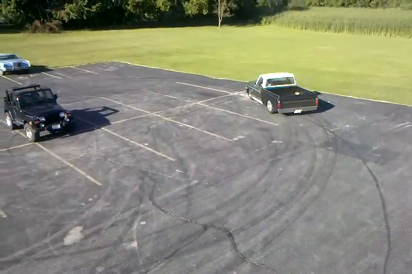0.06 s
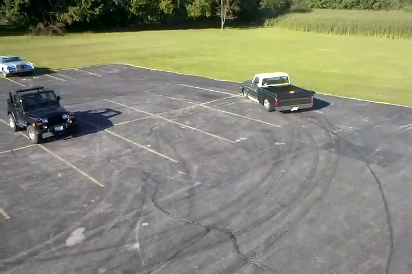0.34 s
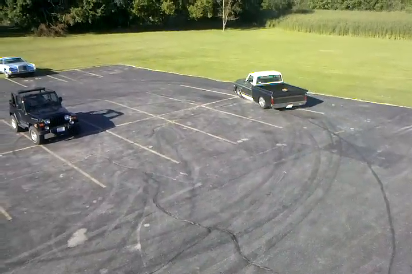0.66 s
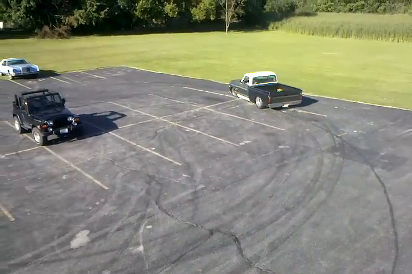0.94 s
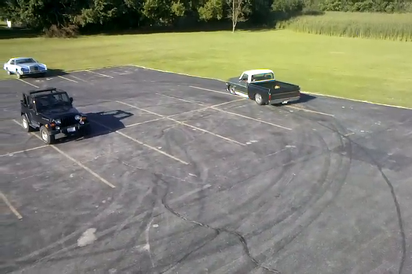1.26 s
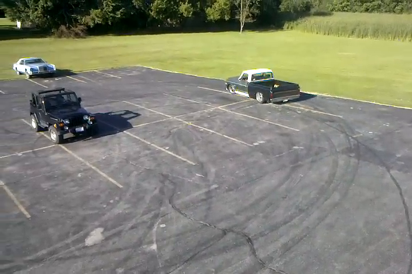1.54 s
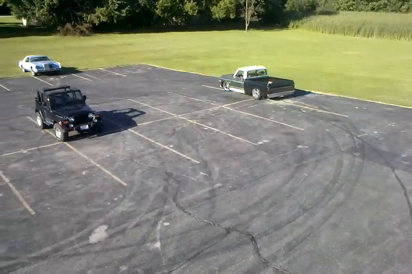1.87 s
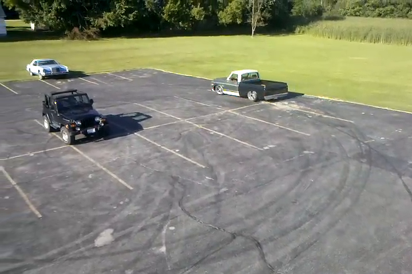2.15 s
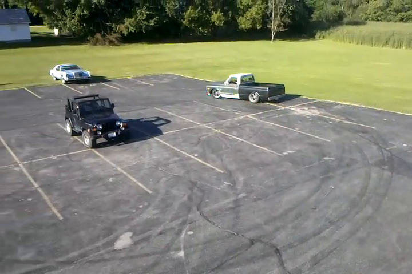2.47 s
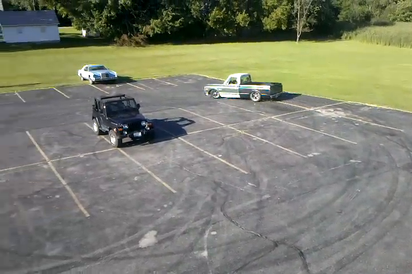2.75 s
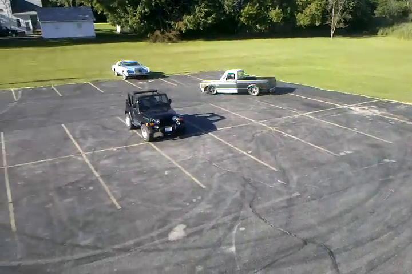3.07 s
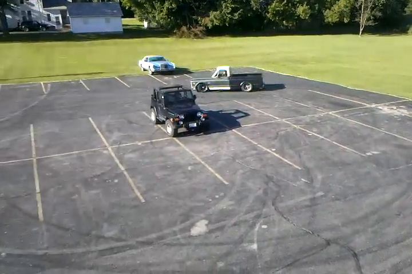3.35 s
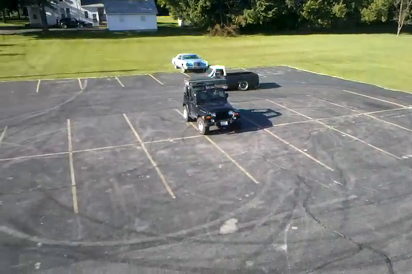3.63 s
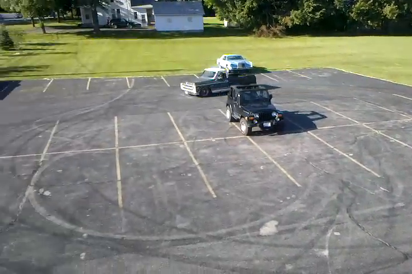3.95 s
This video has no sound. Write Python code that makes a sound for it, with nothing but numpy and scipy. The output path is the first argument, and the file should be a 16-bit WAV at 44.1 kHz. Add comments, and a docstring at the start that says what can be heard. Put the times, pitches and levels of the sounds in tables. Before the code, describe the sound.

A pickup truck's tyres squeal in an open lot. At first its engine burbles low over a faint outdoor rush. From about 1.3 seconds it revs up, with a few faint tyre squeaks. At 2 seconds a loud, rough, wavering squeal begins over the booming exhaust, easing slightly around 3 seconds. From 3.3 seconds the engine climbs higher and the squeal broadens into a scrubbing howl until 4 seconds.

```python
"""A V8 pickup burbles across an open asphalt lot, then is floored into a slide and swings nearer.
Its exhaust booms at the firing rate, shaped by the resonances of the pipe. Two tyres stick and slip
in rough, wavering squeals that break up into a broad scrubbing howl. Trees and parked cars echo the
squeals faintly, over a steady outdoor rush."""
import sys
import numpy as np
from scipy import signal
from scipy.fft import rfft, irfft
from scipy.io import wavfile

SR = 44100
rng = np.random.default_rng(int(sys.argv[2]) if len(sys.argv) > 2 else 0)


def bounce(signal):
    """Save signal as a 16-bit WAV file at the path given by the first command-line argument."""
    frames = np.transpose(np.atleast_2d(signal))
    limited = np.clip(frames, -1, 1)
    pcm = np.round(limited * 32767).astype(np.int16)
    wavfile.write(sys.argv[1], SR, pcm)


N = 176400
TIME = np.arange(N) / SR

# engine run (time [s], firing rate [Hz], level ahead of the pipe [dB])
ENGINE_RUN = [(0, 81.07, -46.5), (.63, 80.2, -40.5), (.74, 70.7, -31), (1.0, 69.35, -34),
              (1.14, 82.05, -33), (1.3, 88.75, -40), (1.6, 103.8, -35.5), (1.75, 119.7, -31),
              (1.89, 137.8, -21.5), (2.02, 144.2, -19.5), (2.23, 137.1, -22), (2.42, 120.4, -22.5),
              (2.76, 132.6, -23.5), (3.16, 165.4, -19), (3.32, 181.6, -20.5), (3.5, 204.2, -23.5),
              (3.86, 250.6, -23.5), (4, 255.8, -32)]
# strong exhaust harmonics; 8 is the firing rate (order [multiple of cycle rate], relative level [dB])
STRONG_ORDERS = [(5, -12), (6, -18.5), (8, 1.5), (10, -17.5), (11, -15), (12, -18), (13, -15), (16, -11)]
# exhaust pipe response (frequency [Hz], gain [dB])
PIPE_RESPONSE = [(35, -41), (65, -21.5), (88, -12.5), (110, -12), (141, -0.5), (180, 1), (250, -8.5),
                 (308, -5.5), (355, -10), (460, -18.5), (640, -12), (1500, -46.5)]
# uneven firing lifts the burble and the orders between firing harmonics (time [s], gain [dB])
UNEVEN_FIRING = [(0, 11), (.9, -8.5), (1.3, 10.5), (1.9, -2.5), (3.1, 2.5), (3.85, 9.5)]
# spectrum of the outdoor rush (frequency [Hz], gain [dB])
AIR_SPECTRUM = [(200, 5), (450, -2), (1000, 0.5), (2350, -6.5), (2750, -20), (5500, -21.5), (7500, -34)]
# strength of the rush (time [s], level [dB])
AIR_ENVELOPE = [(1, -44.5), (1.6, -47)]
# sliding rubber (time [s], carcass roar [dB], tread howl [dB], grit hiss [dB])
SCRUB_LEVELS = [(1.5, -71, -73, -64.5), (2.1, -39, -47.5, -48.5), (2.85, -37, -46.5, -46.5),
                (3.3, -21.5, -36, -42.5), (3.62, -23, -24, -41.5), (3.83, -26, -16.5, -35),
                (4, -26, -16.5, -43)]
# spectra of the roar, howl and hiss (frequency [Hz], gain [dB])
CARCASS_SPECTRUM = [(250, -10), (450, -5.5), (540, 1.5), (690, 2.5), (1050, 6), (1500, -38.5)]
TREAD_SPECTRUM = [(1000, -4.5), (1250, 2), (1450, 13.5), (1700, 9), (2000, -6), (2350, -4), (3250, -55)]
GRIT_SPECTRUM = [(1500, -19.5), (2300, 20.5), (2600, 8), (2900, 13), (3450, 3), (4100, 7.5), (6900, -0.5),
                 (7600, -46)]
# squeaks of creeping tread (time [s], duration [s], pitch [Hz], level [dB])
CREEP_CHIRPS = [(1.357, 0.19, 2160, -56), (1.47, 0.08, 720, -45), (1.627, 0.12, 4720, -61),
                (1.635, 0.085, 776, -52), (1.718, .12, 2116, -55.5)]
# the two squealing tyres (time [s], pitch [Hz], level [dB])
INNER_SQUEAL = [(1.995, 1146, -30), (2.035, 1002, -29), (2.08, 1125, -26.5), (2.14, 1040, -29.5),
                (2.185, 1096, -30), (2.195, 949, -20), (2.26, 982, -23), (2.272, 907.3, -15),
                (2.33, 916.4, -14.5), (2.42, 970.2, -18.5), (2.53, 988.1, -21.5), (2.69, 990, -28.5),
                (2.77, 1095, -26.5), (2.81, 1045, -31.5), (2.94, 1085, -28), (3.16, 1053, -26.5),
                (3.26, 1045, -37.5), (3.56, 930, -22.5), (3.78, 945, -21), (3.85, 885, -21),
                (3.93, 935, -17), (4, 875, -16)]
OUTER_SQUEAL = [(2.25, 859, -20.5), (2.5, 928, -37.5), (2.56, 904.6, -25), (2.61, 940.5, -41),
                (2.63, 932, -21.5), (2.66, 922.2, -32), (3.05, 1012, -37.5), (3.44, 845.2, -30),
                (3.57, 830.5, -18), (3.68, 823, -27), (3.82, 793, -21.5), (4, 770.6, -31.5)]
# squeal overtones (harmonic [multiple of pitch], relative level [dB])
SQUEAL_OVERTONES = [(2, 11.5), (3, -4), (5, -14)]
# the squeal coarsens as the slide widens (time [s], overtones re fundamental [dB], roughness [factor])
SLIP_TEXTURE = [(2, -13, 0.48), (2.25, -17.5, 0.703), (2.45, -13.5, .85), (2.85, -10.5, 1.094),
                (3.15, -9.5, .75), (3.35, -3, 1.45), (3.6, -10, 1.03), (4, -13.5, 1.4)]
# how the tyre radiates its overtones (frequency [Hz], gain [dB])
TYRE_RADIATION = [(1600, -12), (2050, 8.5), (2520, -3), (2850, 9.5), (3250, -11.5), (5000, 5)]
# moments when the sliding rubber bites (time [s])
BITE_TIMES = [2.259, 2.299, 2.357, 2.596, 2.795, 3.0, 3.2]

JITTER_SHARE, JITTER_HZ = 0.02075, 190  # stick-slip pitch spread at roughness 1, and its bandwidth


def undb(db):
    """Decibels to amplitude ratio."""
    return 10 ** (np.asarray(db) / 20)


def unit(x):
    """Normalisation to rms 1."""
    return x / np.sqrt(np.mean(x ** 2))


def curves(table):
    """Linear interpolation of each column over time."""
    rows = np.array(table, float)
    return [np.interp(TIME, rows[:, 0], col) for col in rows[:, 1:].T]


def response(points, hz):
    """Frequency response: gain interpolated in decibels over log frequency."""
    f, db = np.array(points, float).T
    return undb(np.interp(np.log(hz + 1e-9), np.log(f), db))


def colour(x, points):
    """Spectral shaping, with a roll-off below the lowest point; rms 1."""
    hz = np.arange(N // 2 + 1) * SR / N
    roll_off = np.minimum(hz / points[0][0], 1) ** 2
    return unit(irfft(rfft(x) * response(points, hz) * roll_off, N))


def noise():
    """Gaussian white noise."""
    return rng.standard_normal(N)


def wander(hz):
    """Random modulation: noise low-passed at hz; rms 1."""
    f = np.arange(N // 2 + 1) * SR / N
    return unit(irfft(rfft(noise()) / np.sqrt(1 + (f / hz) ** 4), N))


def exhaust():
    """Source and filter: engine harmonics and puffs of gas noise excite the pipe's resonances."""
    weak_order_db, burble_db, puff_decay_s = -20, -14.5, 0.0044
    firing_hz, db = curves(ENGINE_RUN)
    uneven_db = curves(UNEVEN_FIRING)[0]
    firings = np.cumsum(firing_hz * (1 + 0.0018 * wander(11))) / SR
    cycles, cycle_hz = firings / 8, firing_hz / 8  # eight firings to an engine cycle
    strong = {round(k): order_db for k, order_db in STRONG_ORDERS}
    boom = 0
    for k in range(4, 33):
        unsteady_db = wander(5) if k % 8 == 0 else uneven_db + 2.8 * wander(5)
        gain = response(PIPE_RESPONSE, k * cycle_hz) * undb(strong.get(k, weak_order_db) + unsteady_db)
        boom = boom + gain * np.sin(2 * np.pi * (k * cycles + rng.random()))
    since_firing_s = (firings % 1) / firing_hz
    puffs = np.exp(-since_firing_s / puff_decay_s) * noise()
    burble = colour(puffs, PIPE_RESPONSE) * undb(burble_db + uneven_db)
    return undb(db) * (np.sqrt(2) * boom + burble)


def outdoor_rush():
    """Broadband ambient noise, strongest at low frequencies, eases a little."""
    return colour(noise(), AIR_SPECTRUM) * undb(curves(AIR_ENVELOPE)[0])


def tyre_scrub():
    """Friction noise: sliding rubber shakes the carcass and tread blocks and grinds over grit."""
    carcass_db, tread_db, grit_db = curves(SCRUB_LEVELS)
    roar = colour(noise(), CARCASS_SPECTRUM) * undb(carcass_db + wander(30))
    howl = colour(noise(), TREAD_SPECTRUM) * undb(tread_db + wander(28))
    hiss = colour(noise() * undb(wander(900)), GRIT_SPECTRUM) * undb(grit_db)
    onset = np.clip((TIME - 1.1) / .5, 0, 1)
    return (roar + howl + hiss) * onset


def tread_chirps():
    """Brief stick-slip oscillations: the tread creeps and squeaks before the tyres let go."""
    chirps = 0
    for at, length, hz, db in CREEP_CHIRPS:
        phase = 2 * np.pi * np.cumsum(hz * (1 + JITTER_SHARE * wander(JITTER_HZ))) / SR
        envelope = np.exp(-(2 * (TIME - at) / length) ** 2)
        chirps = chirps + undb(db) * envelope * np.sin(phase)
    return chirps


def echo(x, level_db=-11.5, t60_s=0.39, delay_s=0.013):
    """Diffuse reflection from parked cars and trees gives an exponentially decaying tail."""
    tail = noise() * undb(-60 * TIME / t60_s) * (TIME > delay_s)
    return undb(level_db) * signal.fftconvolve(x, tail / np.sqrt(np.sum(tail ** 2)))[:N]


def tyre_squeal(table):
    """Stick-slip oscillation near 1 kHz, modulated in pitch and level as the tread drags over stones."""
    hz, db = curves(table)
    bright_db, roughness = curves(SLIP_TEXTURE)
    waver_share, smear_rad, flutter_db, chatter_db = 0.01204, 1.0, 4, 2.0  # spreads at roughness 1
    shake = roughness * (JITTER_SHARE * wander(JITTER_HZ) + waver_share * wander(27.73))
    phase = 2 * np.pi * np.cumsum(hz * (1 + shake)) / SR
    flutter = lambda: unit(undb(roughness * flutter_db * wander(102)))
    overtones = 0
    for k, overtone_db in SQUEAL_OVERTONES:
        smear = roughness * smear_rad * wander(66)
        overtones = overtones + undb(overtone_db) * np.sin(round(k) * phase + smear) * flutter()
    onset = np.clip((TIME - table[0][0]) / 0.01, 0, 1)
    chatter = unit(undb(roughness * chatter_db * np.tanh(wander(34.4))))  # tread catches and lets go
    fundamental = np.sqrt(2) * np.sin(phase) * flutter()
    radiated = undb(bright_db) * colour(overtones, TYRE_RADIATION)
    return onset * chatter * undb(db) * (fundamental + radiated)


def grip_gain(dip_db=-8.5, length_s=0.017):
    """Amplitude modulation: the squeal drops for an instant whenever the rubber bites."""
    bites = sum(np.exp(-(2 * (TIME - at) / length_s) ** 2) for at in BITE_TIMES)
    return undb(dip_db * bites)


def scene():
    """Superposition of exhaust, tyres, their echo and the rush of the open lot."""
    squeals = tyre_squeal(INNER_SQUEAL) + tyre_squeal(OUTER_SQUEAL)
    tyres = squeals * grip_gain() + tread_chirps()
    return (exhaust() + tyres + echo(tyres) + tyre_scrub() + outdoor_rush())[None]


def record(dry):
    """Saturation and band limiting: a small microphone rounds the peaks and passes little treble."""
    ceiling, cutoff_hz = .85, 7100
    rounded = dry / (1 + (dry / ceiling) ** 6) ** (1 / 6)
    low_pass = signal.ellip(8, .2, 80, cutoff_hz, fs=SR, output="sos")
    fade_out = np.minimum((TIME[-1] - TIME) / .002, 1)
    return signal.sosfilt(low_pass, rounded) * fade_out


dry = scene()
out = record(dry)
bounce(out)
```